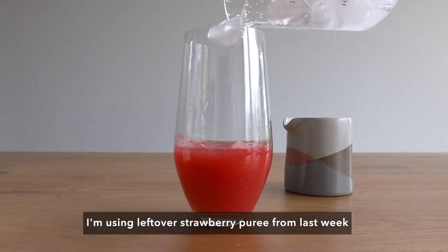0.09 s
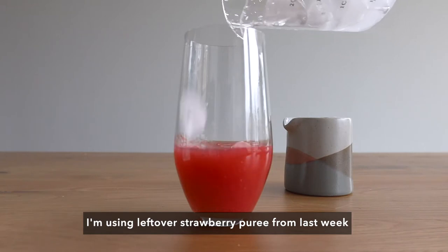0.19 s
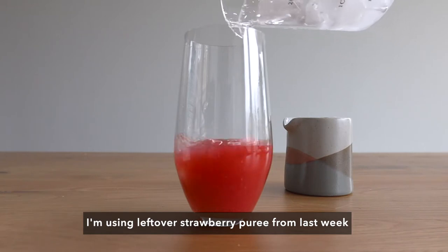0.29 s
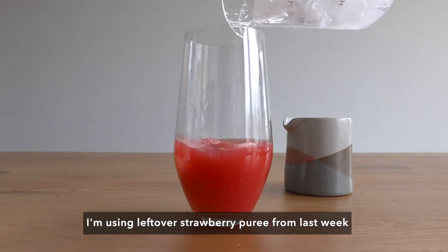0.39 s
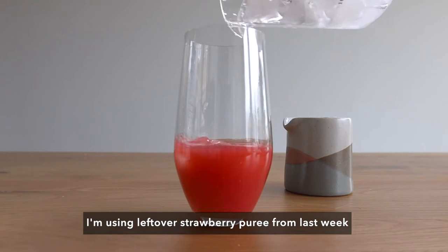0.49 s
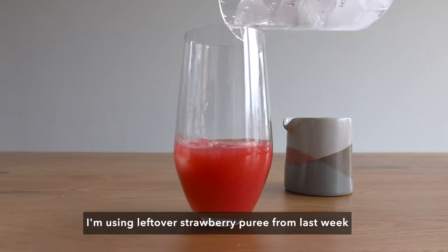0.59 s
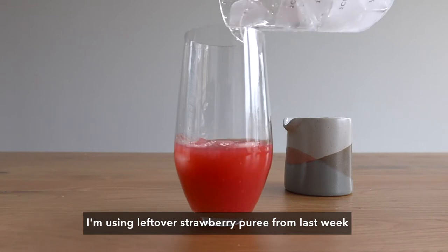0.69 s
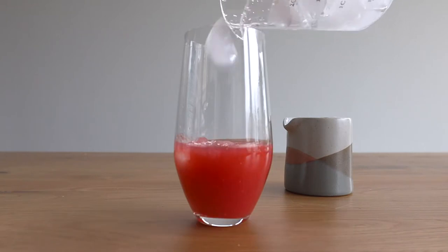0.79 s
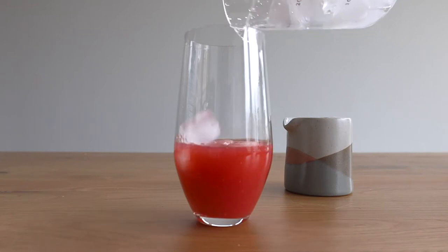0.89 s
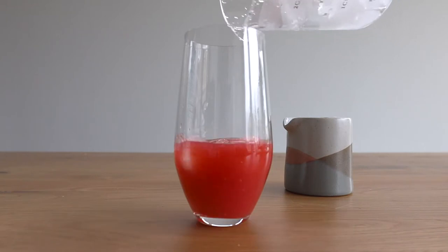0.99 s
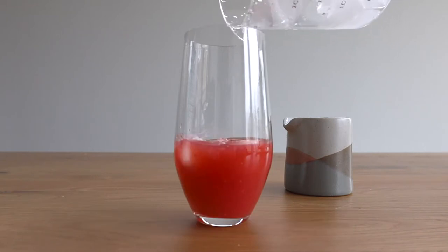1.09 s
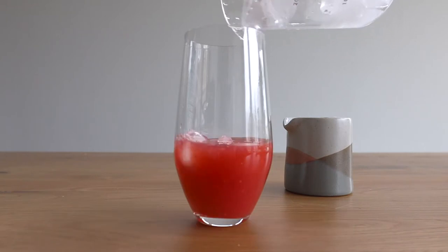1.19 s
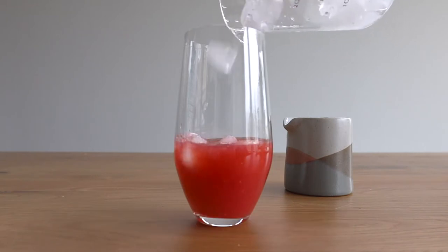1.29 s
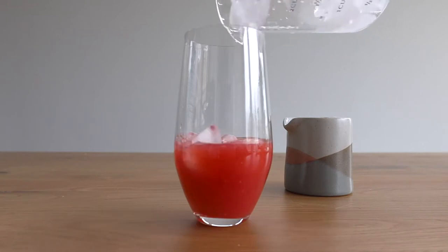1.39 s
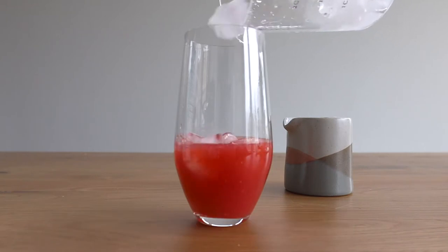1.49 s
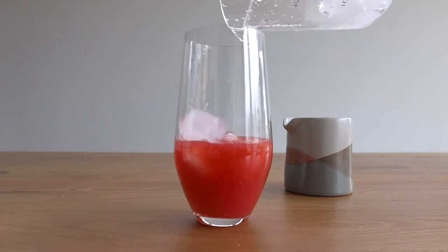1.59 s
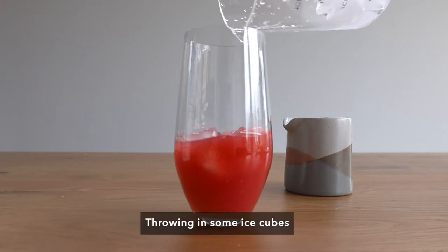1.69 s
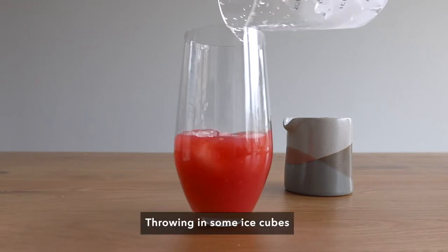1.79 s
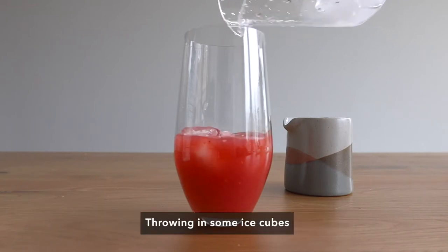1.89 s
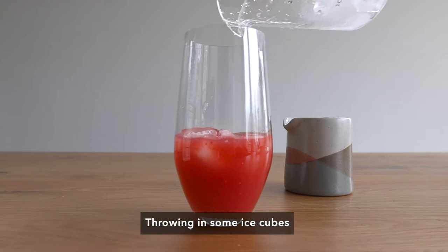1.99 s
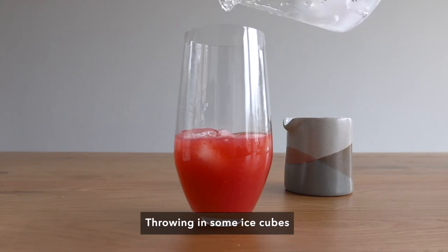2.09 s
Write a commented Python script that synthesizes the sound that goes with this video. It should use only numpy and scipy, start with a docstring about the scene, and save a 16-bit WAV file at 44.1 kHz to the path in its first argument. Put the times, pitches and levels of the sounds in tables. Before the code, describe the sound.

Ice cubes slide from a glass cup and drop into a tall, half-filled glass, a few at a time, with dry knocks, ringing clinks and tiny plips. The microphone is close by in a quiet kitchen.

```python
"""A faint ring of glass, then ice cubes slide out of a glass cup and drop into a tall, half-filled glass.
Cubes that strike the wall make the tall glass ring; cubes that meet each other, the cup or the thick
drink give dry knocks, and some drag air under. The ring sinks in pitch as the drink rises, and cubes
touching the wall damp it. A quiet kitchen, one microphone close by, the room sounding behind the ice."""
import sys
import numpy as np
from scipy import signal
from scipy.fft import rfft, irfft
from scipy.io import wavfile

SR = 44100
rng = np.random.default_rng(int(sys.argv[2]) if len(sys.argv) > 2 else 0)


def master(y):
    """Save y as 16-bit WAV."""
    cut = np.clip(np.atleast_2d(y).T, -1, 1)
    pcm = np.round(cut * 32767)  # scale
    wavfile.write(sys.argv[1], SR, pcm.astype(np.int16))


N = 94815

# modes of the tall glass, where close pairs beat: f/Hz
GLASS_MODE_HZ = [804.3, 801.9, 1771, 1764, 3182, 3200, 4842, 5036, 5146, 5195, 6460, 6452, 7267, 8527, 9860,
                 11175, 12882, 14200]
# the same modes: level/dB, t60/s
GLASS_MODE_DECAY = [(0, 1.0), (-4.5, 2.6), (0, 1.0), (-5, .8), (0, 1.3), (0, 1.3), (-9, .15), (0, .11),
                    (-5, .14), (-8, .18), (0, .12), (-27, .8), (-5, .33), (0, .07), (-6, .12), (-6, .05),
                    (-2, .05), (-6, .03)]
# borders between the eight mode families: f/Hz
FAMILY_EDGES_HZ = [1200, 2400, 3190, 4000, 6000, 7000, 8000]
# families that sink most as the drink rises: index
SINKING_FAMILIES = [0, 1, 4]
# blows on the wall: t/s, level/dB of each family from low to high, damping/dB (sign ignored)
WALL_BLOWS = [(-.3, -40, -37, -42.5, -47, -55, -81, -68, -70, 0),
              (0.2187, -40, -50.5, -38.5, -46, -19.5, -20.5, -22.5, -34.5, 17),
              (0.235, -73, -88, -39, -57, -55, -55, -58.5, -51.5, 6),
              (.8968, -56.5, -88, -76, -85, -68.5, -59, -52.5, -50, -6),
              (.9095, -53, -58, -65, -76.5, -49.5, -66, -52, -86, 14),
              (.9707, -51, -56.5, -49, -71, -38.5, -46.5, -59, -73, 29),
              (1.399, -52.5, -46.5, -68, -96.5, -68, -58, -61, -77, 4),
              (1.5663, -38, -44.5, -38, -54.5, -32, -42, -38.5, -33, 11.5),
              (1.6342, -46.5, -48, -39, -45, -65.5, -44, -52.5, -66, 7.5)]
# rises of the drink: t/s, pitch drop/share of the sinking families, of the others, damping/(dB/s)
DRINK_RISES = [(0.91, 0.00756, 0.00019, 36), (1.628, 0.01052, 0.00298, 2.5)]
# resonances of the cup with its ice: f/Hz, level/dB, t60/s
CUP_MODES = [(630, -6.5, 0.067), (946, -5, 0.034), (2272, -5, 0.042), (3353, 0.5, 0.0244),
             (4276, -6, 0.026), (4780, 6, 0.0089), (7960, -3, 0.018)]
# cubes shifting in the cup: t/s, level/dB under 1.25 kHz, at 1.25-3.6, at 3.6-7.2, above 7.2 kHz
CUP_SHIFTS = [(.093, -66.5, -87, -66, -64), (.0983, -50, -40.5, -41, -59), (.107, -49.5, -65, -60, -74),
              (.1135, -51, -47, -68, -51), (.1185, -49.5, -55, -48, -53.5), (.138, -64.5, -81.5, -67, -85),
              (.560, -66, -65.5, -71, -87), (.716, -59, -54.5, -69, -75), (.7215, -67, -60, -59, -90),
              (.754, -52.5, -56.5, -57, -66), (.7955, -79, -75, -62, -68),
              (.8045, -47.5, -47.5, -54.5, -52), (.888, -71, -75.5, -83, -68),
              (1.180, -58.5, -62.5, -66.5, -65), (1.273, -75, -60, -55, -70),
              (1.2815, -50.5, -44.5, -40.5, -58), (1.320, -86, -73, -73.5, -61)]
# resonances of ice landing in the glass: f/Hz, level/dB, t60/s
LANDING_MODES = [(224, -6, 0.053), (364.7, -3, 0.064), (643, -3, 0.04), (730, 2, 0.028), (873.6, -1, 0.024),
                 (1300, -2, 0.023), (1553, 4.5, 0.0044), (2404, -5, 0.022), (2858, -1.5, 0.012),
                 (3270, -2.5, 0.012), (4032, -5.5, 0.02055), (4740, -2, 0.027), (5100, -5.5, 0.032),
                 (5430, -7.5, 0.036), (8400, 6, 0.015), (8800, 4.5, 0.012), ]
# borders between the five knock bands: f/Hz
KNOCK_EDGES_HZ = [500, 1250, 3600, 7200]
# cubes landing: t/s, level/dB of each knock band from low to high
LANDINGS = [(.2178, -43.5, -45, -34, -34, -36.5), (.224, -40.5, -31.5, -37, -31, -33),
            (.252, -59, -57, -42.5, -40.5, -69), (.234, -36, -36.5, -64, -52, -33.5),
            (.9090, -28.5, -30.5, -34, -34.5, -49.5), (0.9141, -54, -39, -64.5, -51, -67),
            (0.9331, -32, -33.5, -40, -36.5, -66), (0.9452, -45, -41, -42, -33, -67),
            (0.9708, -67.5, -74, -48, -34.5, -46.5), (.987, -50, -46, -75, -53, -53),
            (1.4003, -33.5, -29, -27.5, -24.5, -44), (1.5669, -42, -38, -39, -37, -41.5),
            (1.6197, -32.5, -28.5, -31.5, -42, -71), (1.625, -48, -30.5, -36, -31, -37),
            (1.6347, -43.5, -36, -30, -23, -45), (1.645, -41.5, -41.5, -36, -58, -61),
            (1.681, -47.5, -61, -62, -68, -64)]
# air pockets: t/s, f/Hz, level/dB, t60/s, pitch rise/(share/s)
AIR_POCKETS = [(.228, 2880, -46, .1, .6), (.936, 2850, -41, .13, .7), (1.403, 2815, -37, .14, .1),
               (1.635, 2670, -28.5, .075, 1.6)]
# reverberation of the kitchen: f/Hz, t60/s, level/dB
KITCHEN_DECAY = [(101, .6, 3.5), (206, 0.9, -14.5), (340, 0.49, -1.5), (592.5, 1, -12.5),
                 (800, 0.68, -10.5), (1320, 0.83, -5.5), (2610, 0.47, -11.5), (4790, 0.62, -14),
                 (12800, 0.28, -16.5)]
# spectrum of the room tone: f/Hz, relative level/dB
ROOM_TONE_SHAPE = [(20, -21.5), (50, 0), (120, -10), (300, -7), (800, -9.5), (2500, -10.5), (4500, -13.5),
                   (9000, -18.5), (14000, -28), (16500, -7)]


def from_db(db):
    return 10 ** (np.asarray(db) / 20)


def at_hz(points, hz, column=1):
    points = np.array(points)
    return np.interp(np.log(hz), np.log(points[:, 0]), points[:, column])


def band(x, low, high):
    return signal.sosfilt(signal.butter(2, [low, high], "band", fs=SR, output="sos"), x)


def impulses(times_s, levels_db):
    clicks = np.full(N, 1e-18)
    clicks[(times_s * SR).astype(int)] = from_db(levels_db)
    return clicks


def noise_bursts(clicks, t60):
    envelope = signal.lfilter([1], [1, -from_db(-60 / (t60 * SR))], clicks)
    return envelope * rng.standard_normal(N)


def glass_ring(contact_s=0.0022):
    """Every blow on the wall starts all modes afresh; later touches take level from what still rings."""
    t, out = np.arange(N) / SR, np.zeros(N)
    touch_db = sum(abs(db) * (t >= s) for s, *_, db in WALL_BLOWS)
    drink_db = sum(rate * np.maximum(t - s, 0) for s, *_, rate in DRINK_RISES)
    loss_db = touch_db + drink_db
    for hz, (level_db, t60) in zip(GLASS_MODE_HZ, GLASS_MODE_DECAY):
        family = np.searchsorted(FAMILY_EDGES_HZ, hz)
        column = 1 if family in SINKING_FAMILIES else 2
        drop = sum(rise[column] * (t >= rise[0]) for rise in DRINK_RISES)
        phase = 2 * np.pi * np.cumsum(hz * (1 - drop)) / SR
        for s, *family_db, _ in WALL_BLOWS:
            start = max(int(np.ceil(s * SR)), 0)
            span = slice(start, start + int(t60 * SR * 2))
            age = t[span] - s
            fall_db = loss_db[span] - loss_db[start] + 60 * age / t60
            envelope = from_db(level_db + family_db[family] - fall_db) * np.minimum(age / contact_s, 1)
            out[span] += envelope * np.sin(phase[span] - phase[start])
    return out


def kitchen(x, build_up_s=0.015, opening_age_s=0.19, opening_db=2.5):
    """Diffuse reverberation: noise that dies band by band. A midrange tail is fading at the start."""
    t, tail = np.arange(SR) / SR, 0
    edges = 60 * 2 ** np.arange(0, 8.3, .5)  # half octaves
    for low, high in zip(edges, edges[1:]):
        hz = np.sqrt(low * high)
        t60 = at_hz(KITCHEN_DECAY, hz)
        envelope = from_db(at_hz(KITCHEN_DECAY, hz, column=2) - 60 * t / t60)
        unit_energy = np.sqrt(2 * np.log(1000) / t60 / SR)
        tail = tail + band(rng.standard_normal(SR), low, high) * envelope * unit_energy
    tail *= np.minimum(t / build_up_s, 1)
    out = signal.fftconvolve(x, tail)[:N]
    opening_tail = band(tail, 270, 2200)[int(opening_age_s * SR):]
    out[:len(opening_tail)] += from_db(opening_db) * opening_tail
    return out


def room_tone(level_db=-69.5):
    """The faint hiss and rumble of room and microphone."""
    hz = np.maximum(np.arange(N // 2 + 1) * SR / N, 1)
    noise = irfft(rfft(rng.standard_normal(N)) * from_db(at_hz(ROOM_TONE_SHAPE, hz)), N)
    return from_db(level_db) * noise / noise.std()


def settling_ticks(per_s=25):
    """Wet ice settles in tiny bright ticks at random moments."""
    onsets = rng.random(N) < per_s / SR
    levels_db = -67 + 2.5 * np.minimum(rng.exponential(1, N), 3)
    clicks = onsets * from_db(levels_db) + 1e-18
    return band(noise_bursts(clicks, t60=0.008), 2500, 10000)


def knocks(hits, modes, edges_hz, low_hz, ring_db, crack_db, spread_db=4.5):
    """Each knock of ice is a click into short resonances plus a brief crack of noise, band by band."""
    hits, out = np.array(hits), np.zeros(N)
    times_s, band_db = hits[:, 0], hits[:, 1:]
    scatter_db = spread_db * np.clip(rng.standard_normal((len(hits), len(modes))), -2, 2)
    for k, (hz, level_db, t60) in enumerate(modes):
        strike_db = band_db[:, np.searchsorted(edges_hz, hz)] + scatter_db[:, k]
        clicks = impulses(times_s, strike_db + level_db + ring_db)
        radius, angle = from_db(-60 / (t60 * SR)), 2 * np.pi * hz / SR
        poles = [1, -2 * radius * np.cos(angle), radius ** 2]
        out += (-1) ** k * signal.lfilter([0, np.sin(angle)], poles, clicks)
    edges = [low_hz, *edges_hz, 14000]
    for k, (low, high) in enumerate(zip(edges, edges[1:])):
        crack = noise_bursts(impulses(times_s, band_db[:, k] + crack_db), t60=0.036)
        unit_power = np.sqrt(SR / 2 / (high - low))
        out += band(band(crack, low, high), low, high) * unit_power
    return out


def ice_in_cup():
    """Sliding cubes knock against the cup and each other."""
    return knocks(CUP_SHIFTS, CUP_MODES, KNOCK_EDGES_HZ[1:], low_hz=463, ring_db=1.5, crack_db=-8)


def ice_landing():
    """Falling cubes meet the drink and the other ice with dry knocks."""
    return knocks(LANDINGS, LANDING_MODES, KNOCK_EDGES_HZ, low_hz=103.4, ring_db=-1, crack_db=-5.5)


def wall_clacks(low_hz=1280, high_hz=4770, gain_db=31):
    """The hard contact of cube and wall: a broad click that scales with the 3.2 kHz ring it starts."""
    blows = np.array(WALL_BLOWS[1:])  # the first blow falls before t = 0
    clicks = impulses(blows[:, 0], blows[:, 3] + gain_db)
    return band(band(clicks, low_hz, high_hz), low_hz, high_hz)


def bubbles():
    """Each pocket of air dragged under by a cube rings as a sine that climbs while it dies."""
    out = np.zeros(N)
    for s, hz, level_db, t60, rise in AIR_POCKETS:
        age = np.maximum(np.arange(N) / SR - s, 0)
        phase = 2 * np.pi * hz * (age + rise * age ** 2 / 2)
        out += from_db(level_db - 60 * age / t60) * np.sin(phase)
    return out


def scene():
    """Glass and ice close by, thinned in the bass, with the kitchen around them; mono."""
    direct = glass_ring() + ice_landing() + ice_in_cup() + wall_clacks() + bubbles() + settling_ticks()
    direct = signal.sosfilt(signal.butter(2, 218, "high", fs=SR, output="sos"), direct)
    return (direct + kitchen(direct) + room_tone())[None]


def record(dry):
    """The microphone fades in the top octave; the very top is cut steeply."""
    soft = signal.sosfilt(signal.butter(2, 15900, fs=SR, output="sos"), dry)
    return signal.sosfilt(signal.cheby2(12, 60, 16600, fs=SR, output="sos"), soft)


dry = scene()
out = record(dry)
master(out)
```